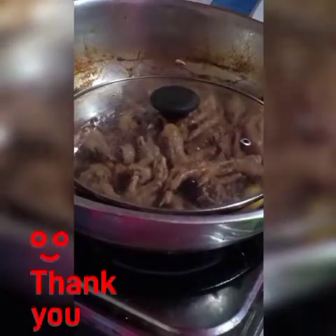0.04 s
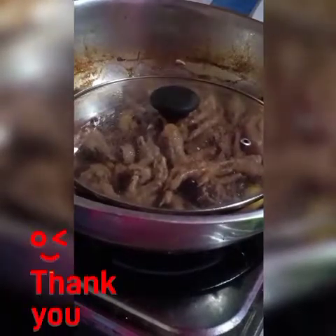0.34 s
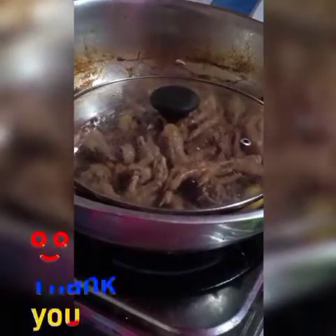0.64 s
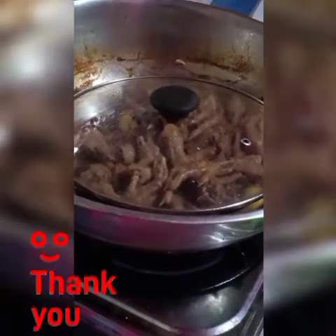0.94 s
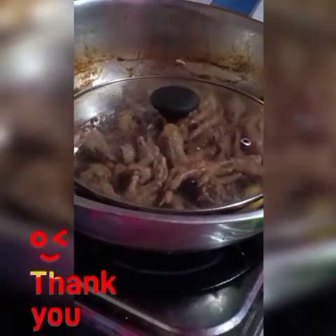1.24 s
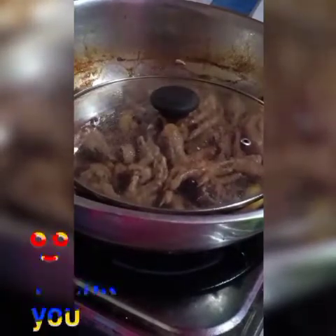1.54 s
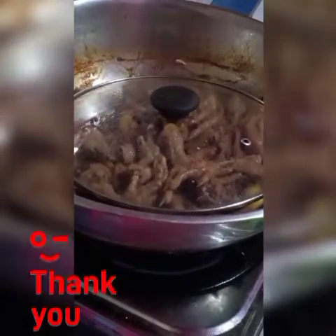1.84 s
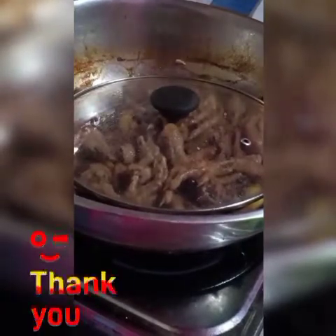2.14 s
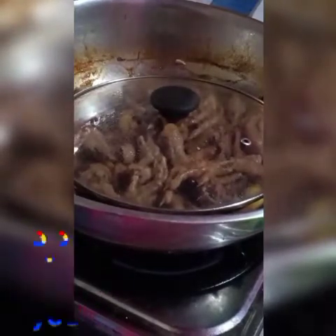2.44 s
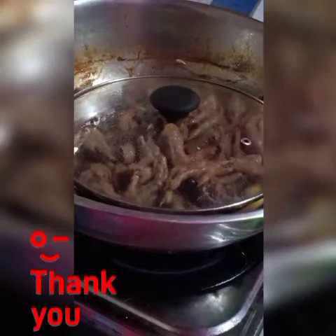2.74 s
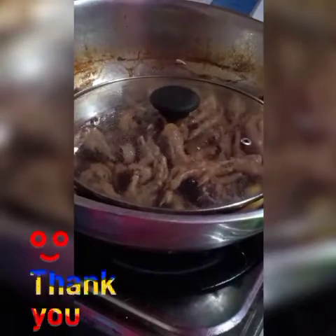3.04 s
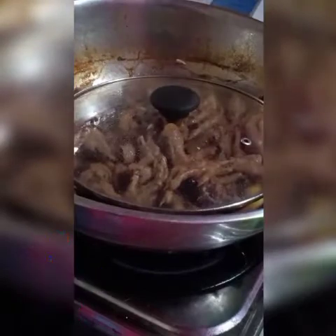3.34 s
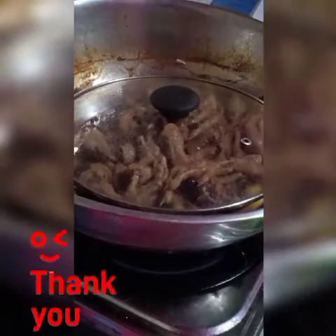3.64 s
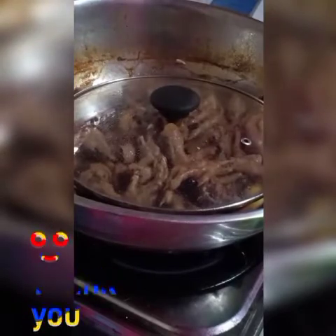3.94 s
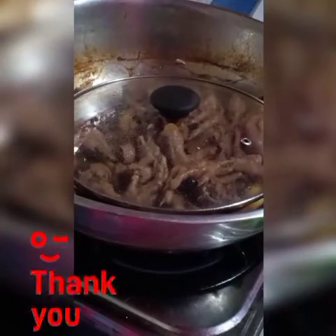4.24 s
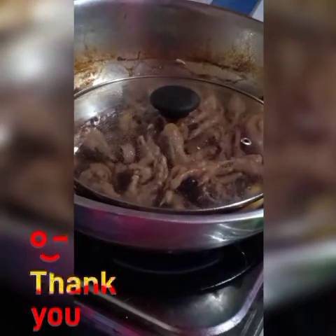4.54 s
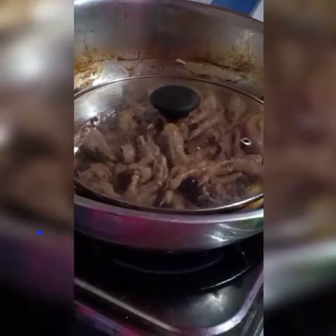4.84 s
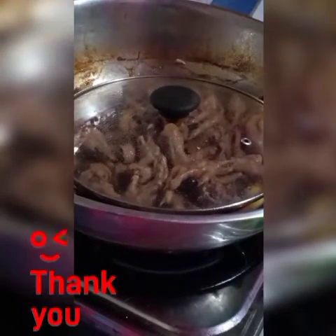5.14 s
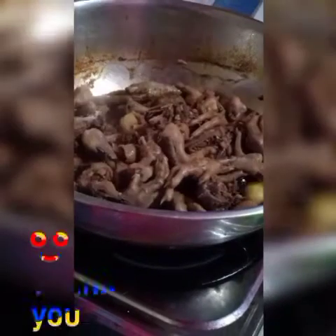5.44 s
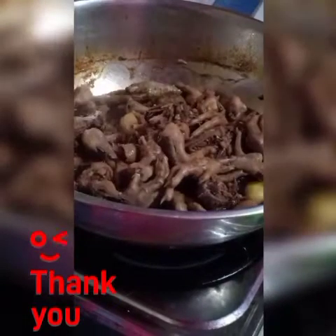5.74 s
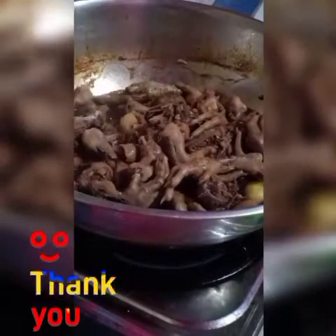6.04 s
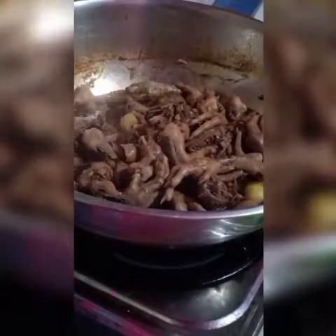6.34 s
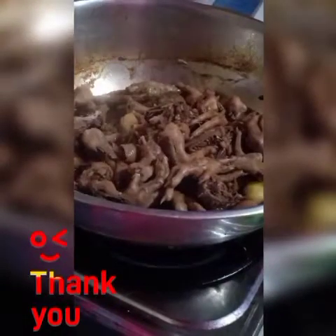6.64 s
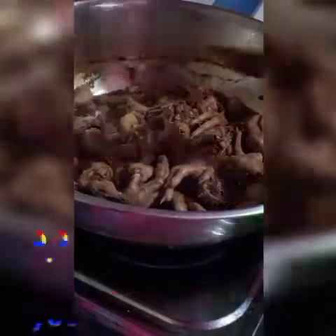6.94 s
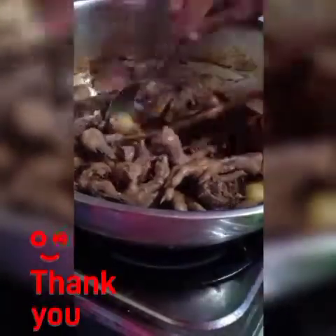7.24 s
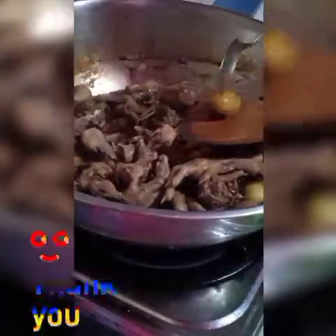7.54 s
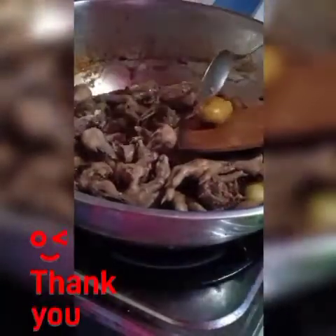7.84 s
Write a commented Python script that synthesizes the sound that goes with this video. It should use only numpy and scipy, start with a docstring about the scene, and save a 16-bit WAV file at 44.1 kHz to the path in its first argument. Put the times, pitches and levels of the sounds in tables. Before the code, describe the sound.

Soft, steady sizzling of simmering meat with high steam chirps and squeals, then open bubbling, thin whistles and one metallic clink.

```python
"""Steam squeals through wet gaps under the glass lid of a steel pan of simmering meat.
It chirps, hisses from a pinhole, spurts, and flaps the film at the rim into a stutter of squeaks.
Then the pan is open: sauce bubbles and whistles thinly, and a utensil scrapes the steel with a clink.
Fizz and spitting fat run underneath, all close up in a small kitchen."""
import sys
import numpy as np
from scipy import signal
from scipy.fft import rfft, irfft, next_fast_len
from scipy.io import wavfile
from scipy.ndimage import map_coordinates

SR = 44100
rng = np.random.default_rng(int(sys.argv[2]) if len(sys.argv) > 2 else 0)


def transcribe(signal):
    """Save signal, clipped to [-1, 1], as a 16-bit WAV file at the path in sys.argv[1]."""
    frames = np.atleast_2d(signal).T
    limited = np.clip(frames, -1, 1)
    pcm = np.round(limited * 32767).astype(np.int16)
    wavfile.write(sys.argv[1], SR, pcm)


N = 356328
TIME = np.arange(N) / SR
OPEN_AT_S, TOP_HZ = 5.46, 15700  # the lid comes off; the top of the band


def amp(db):
    """Decibels to gain."""
    return 10 ** (np.asarray(db) / 20)


def unit(x):
    """Scale to rms 1."""
    return x / np.sqrt(np.mean(x ** 2) + 1e-20)


def along(points, hz):
    """(Hz, value) points read on a log axis."""
    f, v = np.transpose(points)
    return np.interp(np.log(hz + 1), np.log(f + 1), v)


def wobble(rate, size=N):
    """A smooth random curve, rate knots a second."""
    knots = rng.standard_normal(int(size * rate / SR) + 4)
    return map_coordinates(knots, [np.arange(size) * rate / SR])


def waver(rate, size):
    """A wobble for one short sound, up to a quarter second."""
    return wobble(rate, SR // 4)[:size]


def filtered(x, response):
    """x times a response of frequency."""
    m = next_fast_len(len(x) + SR // 5)
    return irfft(rfft(x, m) * response(np.fft.rfftfreq(m, 1 / SR)), m)[:len(x)]


def coloured(x, points):
    """x through a (Hz, dB) EQ curve, at rms 1."""
    return unit(filtered(x, lambda hz: amp(along(points, hz))))


def resonate(x, modes):
    """x through (Hz, width, dB) resonances."""
    return filtered(x, lambda f: sum(amp(db) * 1j * f * width / (hz * hz - f * f + 1j * f * width)
                                     for hz, width, db in modes))


def steep_band(x, hz, width):
    """x twice through one resonance."""
    mode = [(hz, width, 0)]
    return resonate(resonate(x, mode), mode)


def add(track, s, x):
    """Mix x into the track from time s."""
    start = int(np.clip(round(s * SR), 0, N))
    track[start:start + len(x)] += x[:N - start]


def burst(db, t60, size=SR // 10):
    """A noise hit with an instant attack and exponential decay."""
    t = np.arange(size) / SR
    return amp(db - 60 * t / t60) * rng.standard_normal(size)


def swell(length):
    """Time in lengths from the middle of a puff (-1 to 1), and its steep-sided bell of pressure."""
    u = np.arange(-int(length * SR), int(length * SR)) / (length * SR)
    return u, np.exp(-np.abs(u / 0.43) ** 2.9)


def lid_off():
    """Crossfade: 0 while the pan is covered, 1 once it is open."""
    return np.clip((TIME - OPEN_AT_S) / 0.37, 0, 1)


def scattered(x, wet_db, t60, predelay_s):
    """Bounces inside the pan lift some overtones of a short sound and sink others."""
    t = np.arange(SR // 40) / SR
    echo = burst(0, t60, len(t)) * (t > predelay_s)
    path = (t == 0) + amp(wet_db) * echo / np.linalg.norm(echo)
    return signal.fftconvolve(x, path / np.linalg.norm(path))


# Room tone EQ: (frequency [Hz], gain [dB])
ROOM_TONE_EQ = [(20, 0.5), (60, 0), (100, -8), (140, -12), (185, -5), (260, -1), (500, -36)]
def room_tone():
    """A faint low rumble under everything."""
    return amp(-84) * coloured(rng.standard_normal(N), ROOM_TONE_EQ)


# Reverb decay: (frequency [Hz], t60 [s])
KITCHEN_DECAY = [(200, 0.27), (2500, 0.11), (12000, 0.04)]
def kitchen(x):
    """Hard walls answer; the treble dies first."""
    hz, t, spectrum = signal.stft(rng.standard_normal(SR // 2), SR, nperseg=256)
    decay = amp(-60 * t / along(KITCHEN_DECAY, hz)[:, None])
    tail = signal.istft(spectrum * decay, SR, nperseg=256)[1]
    return signal.fftconvolve(x, tail / np.linalg.norm(tail))[:N]


def crackle(rate, spread_db, wash, t60):
    """Tiny uneven bursts, each scattered briefly by the pan, on a wash of countless smaller ones."""
    chance, size = rng.random(N), rng.exponential(size=N)
    hits = (chance < rate / SR) * amp(spread_db * np.minimum(size, np.pi))
    decay = amp(-60 * TIME[:SR // 20] / t60)
    power = np.abs(signal.fftconvolve(hits ** 2, decay ** 2)[:N])
    return unit(np.sqrt(power / power.mean() + wash ** 2) * rng.standard_normal(N))


def spray():
    """Droplets burst on hot steel in small clumps; each spurt of steam throws more."""
    eq = [(300, -46.5), (2000, -6), (5000, -15.5), (8500, -2), (12300, 6.5), (15500, -20)]
    droplets = crackle(rate=300, spread_db=7, wash=0.85, t60=0.022) * amp(2.9 * wobble(45))
    surge_db, delay_s, width_s = 3, 0.014, 0.032
    surges = [np.exp(-((TIME - s - delay_s) / width_s) ** 2) for s, *_ in STEAM_SPURTS]
    return coloured(droplets, eq) * amp(2.5 + surge_db * np.max(surges, axis=0))


# Fizz EQ, lid on and lid off: (frequency [Hz], gain [dB])
COVERED_EQ = [(90, -68.5), (150, -35.5), (260, -21.5), (390, -20.5), (570, -10), (1090, -6.5), (1500, -9),
              (1950, -8.5), (2300, -5), (3200, -5.5), (4400, -10.5), (4900, -12.5), (5500, -11.5),
              (8500, -18.5), (12900, -12), (15500, -20)]
OPEN_EQ = [(90, -60), (160, -37), (333, -22.5), (560, -5.5), (800, -5), (1400, -10.5), (1750, -12),
           (2100, -4), (2650, -5.5), (4000, -12), (7500, -24), (11100, -17), (13000, -26), (15500, -23)]
# Air modes under the lid and in the open pan: (frequency [Hz], width [Hz], gain [dB])
COVERED_MODES = [(265.4, 4.8, 11), (325.2, 2.5, 15), (515, 26, -1), (618.6, 17, 4), (835, 32, 2),
                 (1057, 200, -4.5), (1650, 150, -5), (2152, 100, 1.5), (2320, 103, 2.5), (2580, 95, 0),
                 (2985, 140, 4), (3306, 83, 3), (3810, 180, 1), (4000, 92, -0.5), (4230, 80, 2.5)]
OPEN_MODES = [(2670, 74, -8.5), (3900, 300, -15)]
# Faders, swelling twice as steam forces its way out: (time [s], fizz gain [dB], spray gain [dB])
SIMMER_FADERS = [(0, -51, -61.5), (.6, -51, -69.5), (2.3, -50.5, -67), (2.75, -50.5, -68),
                 (3.28, -49, -53.5), (3.5, -50, -62), (4.7, -50, -61.5), (5.33, -49, -51.5),
                 (5.62, -50, -62.5), (5.9, -53, -58), (7.3, -52.5, -65.5), (7.7, -51.3, -60),
                 (8.08, -52.5, -62)]
def simmer():
    """The bed: fizz from the pan floor, hollow until the lid is off, with fine spray on top."""
    times, *faders = np.transpose(SIMMER_FADERS)
    fizz_db, spray_db = [np.interp(TIME, times, fader) for fader in faders]
    covered = coloured(crackle(rate=650, spread_db=5.5, wash=0.865, t60=0.038), COVERED_EQ)
    covered += amp(1) * resonate(covered, COVERED_MODES)
    uncovered = crackle(rate=700, spread_db=4, wash=1, t60=0.026) * amp(1.3 * wobble(35))
    uncovered = coloured(uncovered, OPEN_EQ)
    uncovered += resonate(uncovered, OPEN_MODES)
    for layer in (covered, uncovered):  # equal presence on both sides of the crossfade
        layer /= np.std(filtered(layer, lambda hz: (hz > 2000) & (hz < 4500)))
    fizz = covered * np.sqrt(1 - lid_off()) + uncovered * np.sqrt(lid_off())
    return fizz * amp(fizz_db + 0.079 * wobble(25)) + spray() * amp(spray_db)


def bubble(hz, t60, rise):
    """A bubble rings and rises in pitch as it nears the surface."""
    t = np.arange(int(t60 * SR) + 2) / SR
    envelope = amp(-60 * t / t60) * (1 - np.exp(-t * hz))
    return envelope * np.sin(2 * np.pi * hz * t * (1 + rise * t / t60))


def sauce():
    """Bubbles of all sizes burst in the thick sauce, building once the lid is off."""
    covered_db, growth_db_per_s = -67, 1.0
    open_db = -62.5 + growth_db_per_s * (TIME - OPEN_AT_S)
    bubbles = np.zeros(N)
    for when, pitch, spread, size in rng.random((600, 4)):
        hz = 470 * 1.8 ** (pitch + spread)
        add(bubbles, when * N / SR, amp(9.6 * size ** 3) * bubble(hz, t60=17 / hz, rise=0.023))
    return unit(bubbles) * amp(covered_db + (open_db - covered_db) * lid_off())


def pings():
    """Tiny bubbles ping in the thin juice once the pan is open."""
    out = np.zeros(N)
    lowest_hz, range_oct = 2100, 1.6
    for when, pitch, softness, life in rng.random((170, 4)):
        ping = bubble(lowest_hz * 2 ** (range_oct * pitch ** 2), t60=0.02 + 0.04 * life, rise=0.027)
        add(out, OPEN_AT_S + (N / SR - OPEN_AT_S) * when, amp(-46 - 14 * softness - 6 * pitch) * ping)
    return out


# Big bubbles: (time [s], pitch [Hz], relative level [dB], t60 [s])
BIG_BUBBLES = [(2.96, 308, -43, 0.031), (2.962, 420, -45, 0.031), (5.701, 560, -41, 0.045),
               (6.06, 620, -41.5, 0.037), (6.34, 750, -39.5, .04), (6.491, 249, -46, 0.065),
               (6.496, 824, -40, 0.033), (6.605, 755, -38.5, 0.036), (6.868, 767, -41.5, 0.073),
               (7.133, 775, -37, 0.049), (7.167, 820, -40.5, 0.032), (7.28, 790, -40, 0.036),
               (7.318, 737, -36, 0.037), (7.557, 672, -39.5, 0.042), (7.685, 744, -40, 0.045),
               (7.771, 750, -41, 0.033), (7.792, 660, -38, 0.024), (7.822, 670, -36, 0.04)]
def glugs():
    """Big bubbles tear open in thick sauce: a dull splash and a short ring, shaped by the crater."""
    out = np.zeros(N)
    for s, hz, db, t60 in BIG_BUBBLES:
        crater_width = 1.27 * hz
        tear = burst(0, t60, SR // 8)
        splash = np.std(tear) * unit(steep_band(tear, hz, crater_width))
        ring = amp(3.5) * bubble(hz, t60, rise=0.05)
        glug = splash + np.pad(ring, (0, len(splash) - len(ring)))
        add(out, s, amp(db - 5) * steep_band(glug, hz, crater_width))
    return out


def puff(length, modes):
    """A short, sputtering rush of steam through (Hz, width, dB) resonances."""
    u, pressure = swell(length)
    rush = sum(amp(db) * unit(steep_band(rng.standard_normal(SR // 4), hz, width))
               for hz, width, db in modes)
    return pressure * unit(rush[:len(u)] * amp(3.3 * waver(453, len(u))))


# Overtone balance of a whistle: (frequency [Hz], gain [dB])
WHISTLE_EQ = [(700, -18), (1700, -20), (2550, -17), (4000, -20), (6000, -17), (7500, -16.5), (11000, -13),
              (15500, -30)]
def whistle(length, hz, glide):
    """Bubbles burst in a quick, uneven train: a gliding comb in a gritty rush, peaking at its pocket's pitch."""
    u, pressure = swell(length)
    train_hz = hz / np.round(hz / (900 * 2 ** rng.uniform(-0.4, 0.4)))  # one overtone lands on hz
    k = np.arange(1, 25)[:, None]
    overtones = k * train_hz
    bend_oct = (glide + 0.06 * rng.standard_normal()) * u - 0.1 * u * u
    bend_oct += 0.0083 * waver(920, len(u)) + 0.0152 * waver(117, len(u))
    phase = 2 * np.pi * np.cumsum(train_hz * 2 ** bend_oct) / SR
    pocket = np.exp(-(np.log2(overtones / hz) / 0.12) ** 2)
    gain = (amp(along(WHISTLE_EQ, overtones)) + pocket) * amp(3.7 * rng.standard_normal(k.shape))
    partials = (overtones < TOP_HZ) * np.sin(k * phase + rng.uniform(0, 2 * np.pi, k.shape))
    comb = unit((gain * partials).sum(0))
    rush = unit(resonate(rng.standard_normal(len(u)), [(hz, 2600, 0)]))
    return pressure * unit((comb + amp(-12) * rush) * amp(4.4 * waver(189, len(u))))


# Featured whistles: (middle [s], length [s], pitch [Hz], relative level [dB])
SAUCE_WHISTLES = [(0.336, 0.058, 13500, -51), (5.682, 0.032, 11200, -51), (5.745, 0.05, 8800, -62),
                  (5.825, 0.054, 10650, -53), (5.902, 0.033, 11150, -55), (6.136, 0.0514, 11090, -52.5),
                  (6.332, 0.0446, 11830, -48), (6.382, 0.047, 10660, -51.5), (6.447, 0.028, 9770, -50),
                  (6.863, 0.014, 9640, -41.5), (7.138, 0.049, 10120, -50.5), (7.518, 0.068, 9900, -51.5),
                  (7.613, 0.0298, 9840, -45), (7.754, 0.031, 10500, -50), (7.856, 0.046, 10060, -48.5),
                  (7.892, 0.051, 9890, -49), (8.065, 0.048, 9860, -51.5)]
def whistles():
    """Steam pockets in the sauce whistle with a little rush; fainter ones and peeps fill the gaps."""
    out = np.zeros(N)
    for s, length, hz, db in SAUCE_WHISTLES:
        add(out, s - length, amp(db + 1.5) * whistle(length, hz, glide=-0.12))
        add(out, s - length, amp(db - 5) * puff(length, [(hz, 2500, -7), (2550, 300, 0)]))
    for when, slide in rng.random((36, 2)):  # faint whistles sink in pitch once the lid is off
        open_for_s = (N / SR - OPEN_AT_S) * when
        faint = whistle(length=0.036, hz=10630 - 240 * open_for_s, glide=0.3 * (slide - 0.6))
        add(out, OPEN_AT_S + open_for_s, amp(-57.5) * faint)
    for when, pitch, size, slide, life in rng.random((330, 5)):  # peeps thicken towards the end
        hz = 11900 - 1700 * pitch - 4500 * pitch ** 4
        length = 0.00686 + 0.0185 * life ** 2
        peep = flutter(length, hz, 0.26 * (slide - 0.6), hz, rough=0.12, rasp_db=-20, arch=0.278)
        add(out, 3.6 + 4.4 * when ** 0.58, amp(-61 + 10.15 * size ** 2 - 3 * pitch) * peep)
    return out


def pan_walls(x):
    """Slap between the steel walls, different from each spot in the pan: a new echo every 25 ms."""
    out, block = np.zeros(N), SR // 40
    for start in range(0, N, block):
        add(out, start / SR, scattered(x[start:start + block], wet_db=-5.5, t60=0.034, predelay_s=0.001))
    return out


# Spits of fat and bursting steam pockets: (time [s], relative level [dB])
FAT_SPITS = [(0.053, -40), (.169, -37), (0.2236, -32), (0.3839, -38), (.8455, -31.5), (0.8658, -32),
             (1.2466, -36), (1.4555, -36), (2.17, -38), (2.8624, -34.5), (3.051, -43), (3.488, -33),
             (3.8082, -33.5), (3.8472, -38), (3.954, -34), (4.212, -35.5), (4.4912, -40), (5.5668, -34),
             (6.1653, -34), (6.3396, -33), (6.512, -35.5), (6.5599, -25.5), (6.626, -26), (6.655, -27),
             (6.662, -26.5), (6.732, -32.5), (6.8575, -31.5)]
STEAM_PLOPS = [(.184, -40), (.2239, -36), (0.8465, -29.5), (0.8666, -29.5), (3.81, -30.5)]
# EQ of the bright crack and of the low body: (frequency [Hz], gain [dB])
CRACK_EQ = [(150, -60), (900, -26), (2400, 14), (5000, 8), (7500, 2), (12000, 10), (15500, 2.5)]
BODY_EQ = [(80, -68), (180, -34), (350, -11.5), (650, 3), (900, 1), (1400, -3.5), (1950, 2), (2600, -20),
           (6000, -38)]
def spits_and_plops():
    """Fat spits with a sharp crack and a low body, among faint ticks; steam pockets plop."""
    cracks, bodies = np.zeros((2, N))
    for s, db in FAT_SPITS:
        add(cracks, s, burst(db - 4.5, t60=0.022))
        add(bodies, s, burst(db - 25, t60=0.032))
    for s, db in STEAM_PLOPS:
        add(bodies, s, burst(db - 7.5, t60=0.034))
    for when, size in rng.random((40, 2)):  # ticks
        add(cracks, when * N / SR, burst(-50 + 8 * size ** 2, t60=0.0073))
    bright = np.std(cracks) * coloured(pan_walls(cracks), CRACK_EQ)
    return bright + np.std(bodies) * coloured(bodies, BODY_EQ)


# The utensil catches and slips: (time [s], relative level [dB], t60 [s])
UTENSIL_SLIPS = [(6.8896, -32.5, 0.03), (6.892, -30, 0.068), (6.896, -24, 0.036), (6.9043, -23.5, 0.033),
                 (6.912, -26.5, 0.042), (6.9144, -29.5, 0.052), (6.922, -35, 0.024), (6.925, -29, 0.026)]
# Scrape EQ: (frequency [Hz], gain [dB])
SCRAPE_EQ = [(150, -42), (400, -42), (1430, -19.5), (1750, -21.5), (3590, -9.5), (3880, -18), (4600, -7.5),
             (7170, -20), (9610, -22), (11700, -25), (15700, -54.5)]
# Ring of the steel: (frequency [Hz], width [Hz], gain [dB])
STEEL_MODES = [(3800, 52, -5), (4800, 63, 2), (4616, 136, 4), (5465, 130, 1), (11600, 206, -2.5),
               (11400, 110, -6.5)]
def clink():
    """A utensil chatters along the pan; the food damps the steel's ring."""
    friction = np.zeros(N)
    for s, db, t60 in UTENSIL_SLIPS:
        add(friction, s, burst(db, t60))
    scrape = amp(-2) * coloured(friction, SCRAPE_EQ)
    ring = amp(-3.5) * unit(resonate(friction, STEEL_MODES))
    return np.std(friction) * (scrape + ring)


# Pinhole hiss EQ: (frequency [Hz], gain [dB])
JET_EQ = [(7000, -53), (10700, -25), (11000, -2), (11500, -7), (12200, -15), (13200, -23.5), (15500, -27)]
def jet():
    """A pinhole of steam sings at the foot of its own hiss, louder and lower as pressure builds."""
    start_s, peak_s, attack_s = 2.38, 3.352, 0.11
    swell_db, release_db_per_s, sag_hz = 18.5, 137, 353
    pressure = np.clip((TIME - start_s) / (peak_s - start_s), 0, 1) ** 2
    level_db = -57.5 + swell_db * pressure - release_db_per_s * np.maximum(TIME - peak_s, 0)
    hz = 11230 - sag_hz * pressure + 130 * wobble(700)
    note = unit(np.sin(2 * np.pi * np.cumsum(hz) / SR) * wobble(200))
    hiss = coloured(rng.standard_normal(N), JET_EQ)
    attack = np.clip((TIME - start_s) / attack_s, 0, 1)
    return attack * amp(level_db + 0.8 * wobble(75)) * (amp(-6.5) * note + amp(-1.5) * hiss)


def flutter(length, pitch_hz, glide, gap_hz, rough, rasp_db, arch):
    """A wet film flaps in the steam; its pitch arches with pressure and the gap picks out an overtone."""
    u, pressure = swell(length)
    jitter_oct = rough * (0.1 * waver(1508, len(u)) + 0.057 * waver(313.8, len(u)))
    bend_oct = glide * np.clip(u, -0.7, 0.7) - arch * np.minimum(u * u, 0.3)
    phase = 2 * np.pi * np.cumsum(pitch_hz * 2 ** (bend_oct + jitter_oct)) / SR
    k = np.arange(1, 9)[:, None]
    overtones = k * pitch_hz
    gap = np.exp(-(np.log2(overtones / gap_hz) / 0.31) ** 2)
    film = (amp(-21) * (k == 1) + amp(rasp_db)) / (1 + (overtones / gap_hz / 2.25) ** 8)
    partials = (overtones < TOP_HZ) * np.sin(k * phase + rng.uniform(0, 2 * np.pi, k.shape))
    tone = ((gap + film) * partials).sum(0)
    # a little hiss slips through each time the film opens
    leak = (1 + np.sin(phase)) * rng.standard_normal(len(u))
    leak_eq = [(300, -41), (1200, -11), (4000, -1), (5800, -6), (7500, -19.5), (15000, -17)]
    hiss = rough * amp(-6) * coloured(leak, leak_eq)
    return pressure * unit((tone + hiss) * amp(6.4 * rough * waver(545, len(u))))


def squeak(length, pitch_hz, glide, gap_hz, rough, db, arch):
    """A flutter bouncing in the pan; hard blowing locks the film to the gap, so the tone is purer."""
    rasp_db = -17 - 0.2 * max(db, -41)
    tone = flutter(length, pitch_hz, glide, gap_hz, rough, rasp_db, arch)
    return amp(db) * scattered(tone, wet_db=-6, t60=0.021, predelay_s=0.0005)


# Lone chirps: (middle [s], length [s], pitch [Hz], glide [oct/length], arch [oct/length^2],
# level [dB], roughness [0-1])
WET_CHIRPS = [(0.142, 0.031, 1567, 0.42, 0.275, -44, 0.27), (0.41, 0.029, 10500, 0.39, 0, -49.5, 0.7),
              (.457, 0.024, 870, -0.072, .2, -59, .1), (0.621, 0.045, 1282, -0.12, .3, -47.5, 0),
              (0.69, 0.089, 1000, -0.28, 0, -55, 0), (2.467, 0.054, 6450, 0.55, .3, -54, 0.6),
              (3.142, .098, 10000, 0, .02, -53, 0.1), (3.373, 0.029, 3900, 0.37, .3, -45, 0.3),
              (3.544, 0.032, 4500, 0.34, .35, -50.5, 0.2), (3.632, 0.037, 7150, 0.054, .3, -56, 0.1),
              (3.759, 0.051, 7300, 0.091, .6, -45, 0.13), (4.18, 0.033, 7150, -.15, .4, -57, .12),
              (5.23, 0.04, 7690, .8, .3, -51, 0.8), (5.485, 0.048, 9300, -.08, .1, -54, 0.06),
              (5.681, 0.02, 8420, -0.06, .2, -60, 0.25), (5.706, 0.028, 7400, -0.097, .3, -59, 0.35),
              (5.804, 0.039, 7240, -0.22, .3, -58, 0.35), (5.868, 0.027, 6400, -.2, .3, -58, .4),
              (5.955, 0.0206, 8450, 0.0046, .3, -57, 0.35), (6.195, 0.03, 5750, 0.045, .2, -56.5, 0.16),
              (7.225, 0.038, 2050, -.25, 0, -49, .2), (7.466, 0.032, 2610, 0.15, .3, -50, 0.33),
              (7.524, 0.057, 5100, -0.053, .3, -52, 0.58), (7.614, 0.033, 2588, -.05, .3, -58, 0.25),
              (7.757, 0.014, 2416, 0.018, .3, -49, 0.34), (7.835, .025, 2600, -0.63, .1, -50, 0.44),
              (7.906, 0.049, 2520, -0.11, .1, -47, 0.3)]
def chirps():
    """Steam slips through wet gaps in single chirps, each resonating on its fundamental."""
    out = np.zeros(N)
    for s, length, hz, glide, arch, db, rough in WET_CHIRPS:
        add(out, s - length, squeak(length, hz, glide, hz, rough, db, arch))
    return out


# Spurts, up to about seven a second: (middle [s], pitch [Hz], relative level [dB], roughness [0-1])
STEAM_SPURTS = [(3.084, 4370, -37.5, 0.1), (3.579, 4370, -39, 0.23), (3.739, 4638, -35.5, 0),
                (3.944, 4575, -38, 0.09), (4.083, 4510, -40.5, 0.15), (4.238, 4290, -41, 0.36),
                (4.371, 3970, -42.5, 0.37), (4.507, 4140, -44, 0.2), (4.795, 4155, -41, 0.12),
                (4.956, 4000, -44.5, 0.43), (5.097, 4400, -40.5, 0.46), (5.215, 5570, -44, 0.5),
                (5.243, 9040, -46, 0.33)]
def spurts():
    """Steam spurts in a hoarse rush, then a thin note catches; harder spurts have shorter notes."""
    out = np.zeros(N)
    rush_s, lead_s, halving_db = 0.029, 0.005, 8.5
    for s, hz, db, rough in STEAM_SPURTS:
        rush = puff(rush_s, [(hz, 900, -1), (hz * 0.895, 1100, 0)])
        add(out, s - lead_s - rush_s, amp(db - 6.5 + 15 * rough) * rush)
        note_s = rush_s * 2 ** ((-40 - db) / halving_db)
        note = flutter(note_s, hz, glide=-0.0126, gap_hz=hz, rough=rough + 0.12, rasp_db=-21, arch=0.162)
        add(out, s - note_s, amp(db - 0.5 - 10 * rough) * note)
    return out


# Bouts of buzzing: (middle [s], length [s], level [dB])
RIM_BUZZES = [(4.519, 0.03, -37), (4.559, 0.024, -42.5), (4.65, 0.022, -41), (4.682, 0.034, -39),
              (4.727, 0.041, -43.5), (4.787, 0.051, -40), (4.87, 0.04, -36), (4.932, 0.022, -45),
              (4.97, 0.026, -44.5), (5.024, 0.013, -40), (5.091, 0.02, -38), (5.126, 0.018, -36),
              (5.146, 0.017, -33.5), (5.168, 0.015, -29)]
# Pitch curve of the film: (time [s], pitch [Hz])
RIM_PITCH = [(4.52, 1010), (4.68, 983), (4.79, 929), (4.89, 874.6), (5.02, 900), (5.1, 1008), (5.17, 945)]
def buzzes():
    """The wet film at the rim buzzes in bouts; the gap resonates near its third harmonic."""
    out = np.zeros(N)
    settle_s = 0.041  # the film needs time to settle, so short bouts are rough
    for s, length, db in RIM_BUZZES:
        hz = np.interp(s, *np.transpose(RIM_PITCH))
        rough = 0.73 * np.exp(-length / settle_s)
        buzz = squeak(length, hz, glide=-0.1127, gap_hz=3.1 * hz, rough=rough, db=db, arch=0.302)
        add(out, s - length, buzz)
    return out


# Clear squeaks: (middle [s], length [s], pitch [Hz], glide [oct/length], arch [oct/length^2],
# level [dB], gap resonance [Hz])
RIM_SQUEAKS = [(4.891, 0.02, 859, -0.13, 0.38, -40, 1760), (5.156, 0.0145, 1330, -.4, 0.25, -35, 1500),
               (5.199, 0.034, 1150, -.08, 0.29, -40.5, 1670), (5.234, 0.015, 1290, -.45, 0.35, -22.5, 2350),
               (5.251, 0.017, 1352, 0.203, 0.585, -30.5, 1410),
               (5.267, 0.0145, 1302, -0.25, 0.29, -21, 2320), (5.294, 0.011, 1412, -0.49, 0.68, -25, 2207),
               (5.322, 0.015, 1863, -0.25, 1, -25, 3740), (5.3523, 0.011, 1913, .03, 0.98, -23, 3710),
               (5.386, 0.018, 1870, -0.031, 0.574, -27, 3800), (5.421, 0.014, 1720, -0.017, .6, -31, 3500)]
def stutter():
    """The film locks into clear squeaks, ending in a quick stutter."""
    out = np.zeros(N)
    for s, length, hz, glide, arch, db, gap_hz in RIM_SQUEAKS:
        add(out, s - length, squeak(length, hz, glide, gap_hz, rough=0.3, db=db, arch=arch))
    return out


# Ring of the pan wall: (frequency [Hz], width [Hz], gain [dB])
WALL_MODES = [(1160, 15, -15), (1410, 31, -5), (2480, 40, 0), (2765, 36, 3), (3220, 22, -1), (3340, 19, -6),
              (3420, 9.6, -12), (3560, 37, -3), (3800, 96, -13), (4660, 37, -12), (7580, 23, 14)]
def squeals():
    """The lead: steam squeezes through wet gaps, and the pan wall rings on after each squeak."""
    steam = chirps() + spurts() + buzzes() + stutter()
    return steam + resonate(steam, WALL_MODES)


def scene():
    """Mono mix: the short events feed the kitchen reverb; the bed and the jet stay dry."""
    events = squeals() + whistles() + pings() + spits_and_plops() + glugs() + clink()
    bed = room_tone() + simmer() + sauce()
    return (bed + jet() + events + amp(-9.5) * kitchen(events))[None]


def record(dry):
    """A phone's sound: a brick-wall low-pass and a slight DC offset."""
    dc_offset = 0.0007
    return np.array([filtered(x, lambda hz: hz < TOP_HZ) for x in dry]) + dc_offset


dry = scene()
out = record(dry)
transcribe(out)
```